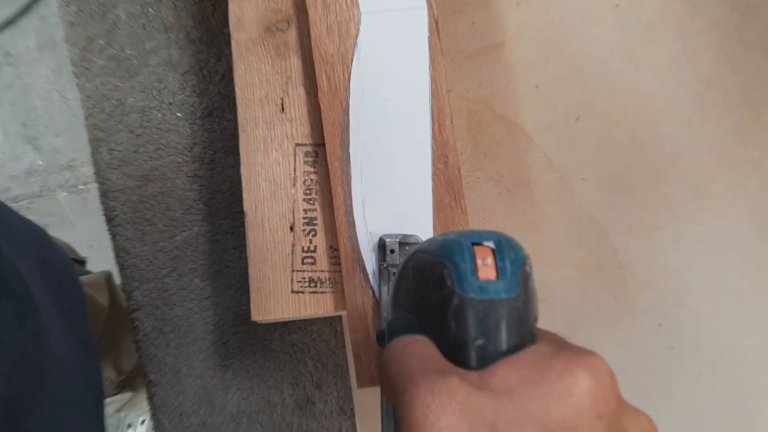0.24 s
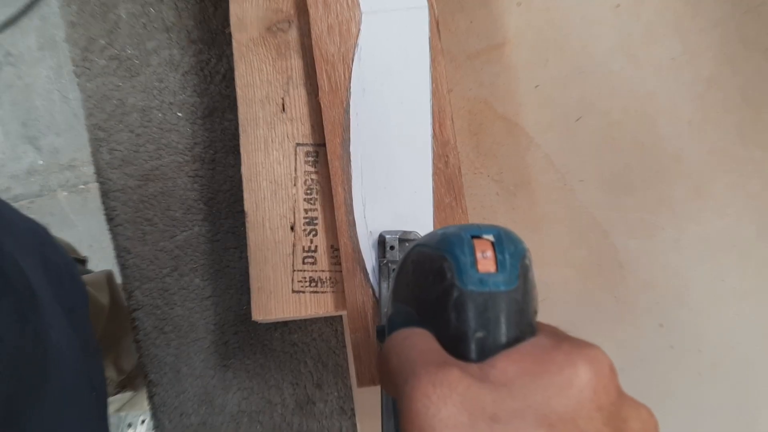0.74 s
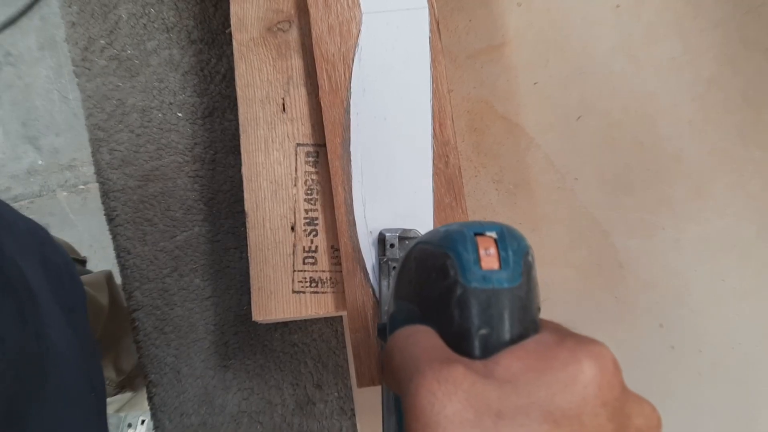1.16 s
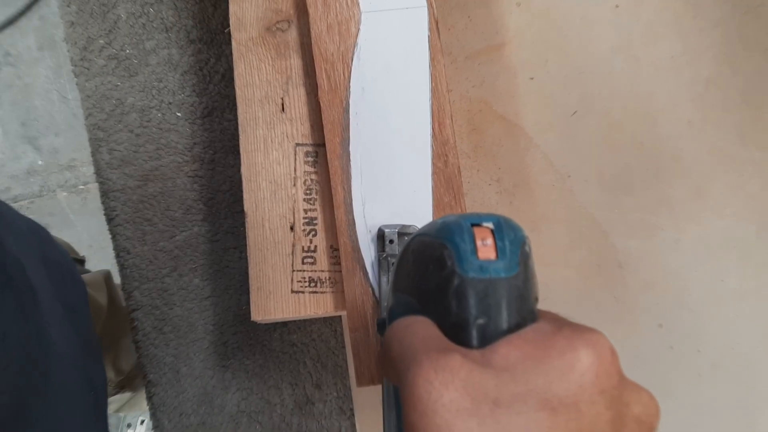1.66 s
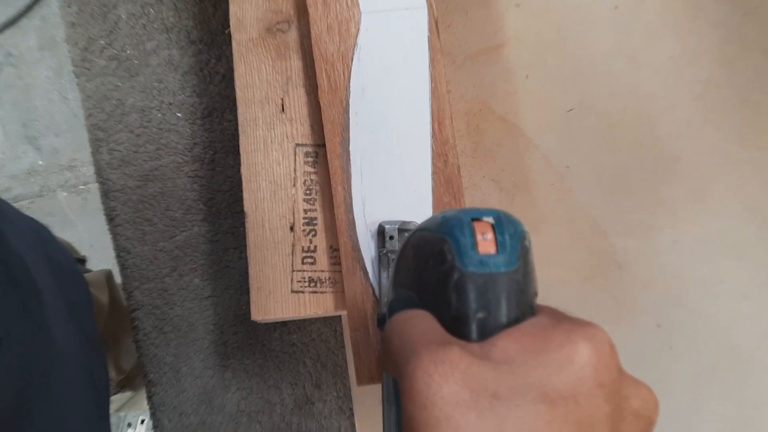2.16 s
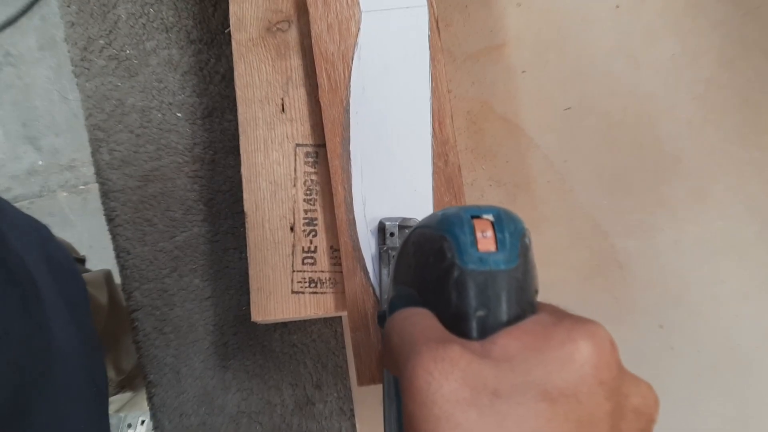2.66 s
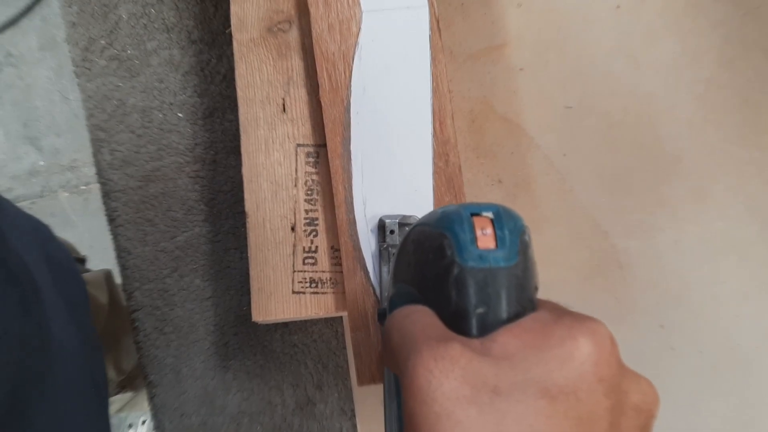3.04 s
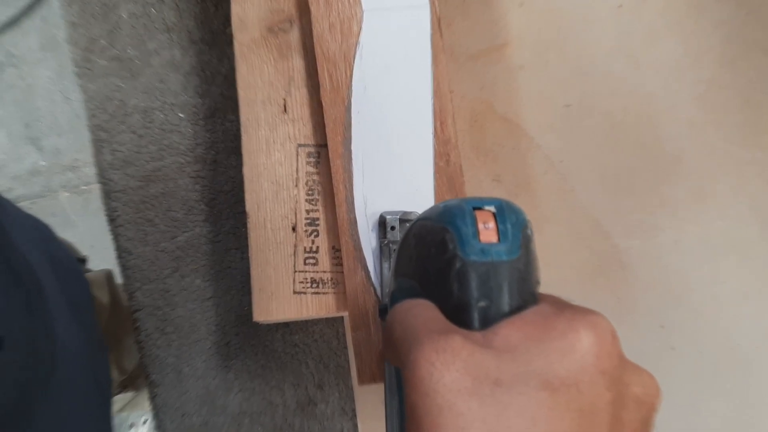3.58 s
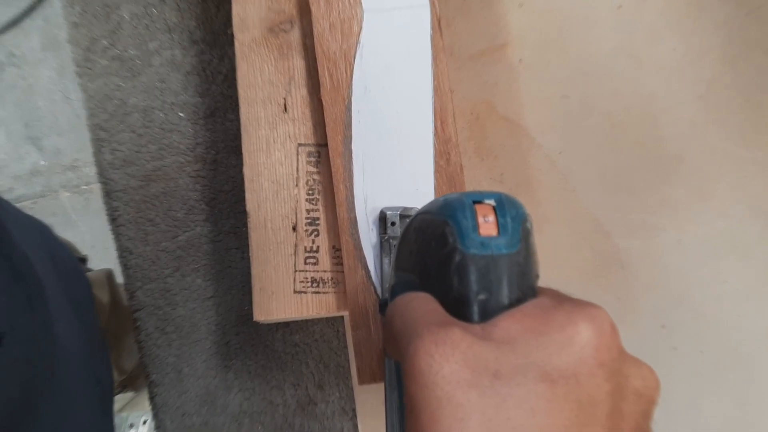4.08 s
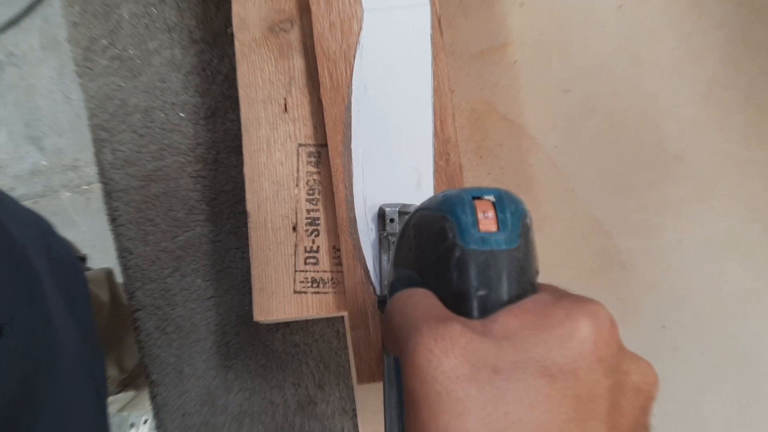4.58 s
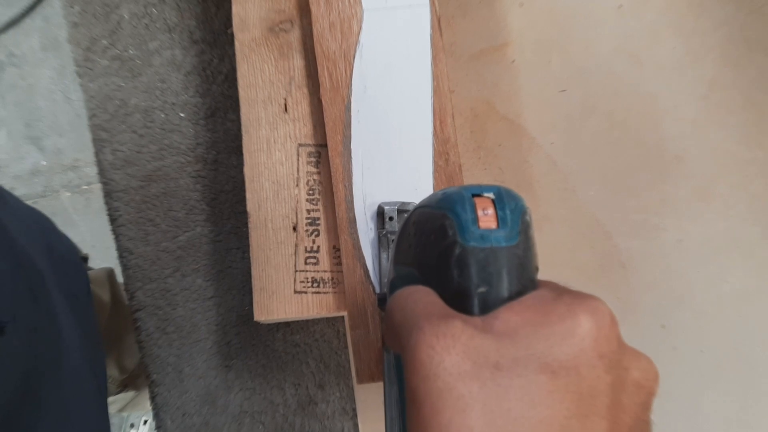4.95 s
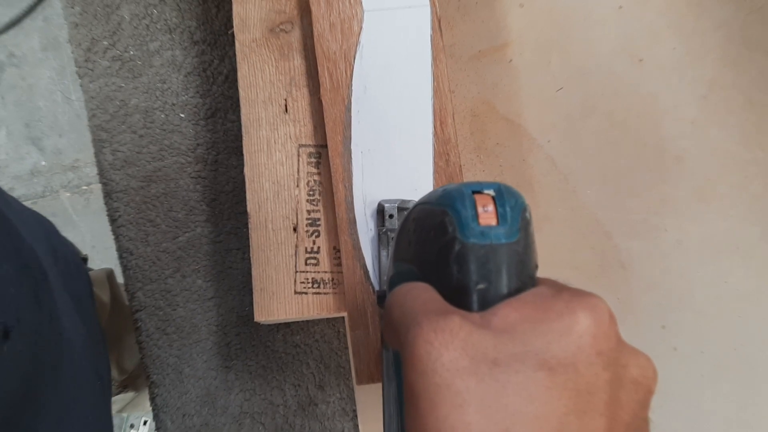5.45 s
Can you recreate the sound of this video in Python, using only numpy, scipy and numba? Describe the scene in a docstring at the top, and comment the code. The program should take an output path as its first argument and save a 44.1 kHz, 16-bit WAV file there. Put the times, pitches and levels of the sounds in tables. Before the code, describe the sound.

A jigsaw cuts along a curve in a wooden board, heard close and dry in stereo. At 0 s a low motor drone and fan are briefly exposed, then within about 0.2 s the blade takes hold and the cut swells to a loud, dense buzz. About 44 strokes a second fuse into a rough rattle: woody ringing around 1 to 3 kHz, piercing metallic chatter and squeaks around 4 to 5 kHz, and airy sawdust hiss above. Gear hum and a faint whine lie beneath. Sharp small cracks come near 0.6, 1.1, 1.5 and 1.9 s, with slight fluttering hops. The motor sags a little from 2 to 4.3 s, and the rasp eases after 3 s. From 3.8 to 5 s catches and lurches crowd together, making it jerkier. From 4.9 s the blade chafes brighter as speed recovers; cutting continues to the end, about 5.7 s.

```python
"""An electric jigsaw cuts along a curve in a board, heard from just above the tool.
About 44 times a second the teeth rasp up through the wood: noise bursts and a repeating rattle ring
resonant modes of board and blade, with short notes, sawdust hiss, squeaks, chafing and sharp catches.
The plunger knocks at both ends of its travel as a bending tone plus ringing noise. Below it the gears hum
and whine as sines locked to the strokes, and the motor fan rushes as coloured noise."""
import sys
import numpy as np
from scipy import signal
from scipy.fft import rfft, irfft, next_fast_len
from scipy.io import wavfile
from numba import njit

SR = 44100
rng = np.random.default_rng(int(sys.argv[2]) if len(sys.argv) > 2 else 0)


def wav_out(sig):
    """Save sig, one row per channel (or a flat mono array), as 16-bit PCM at SR to the path in sys.argv[1]."""
    wavfile.write(sys.argv[1], SR, np.round(np.clip(np.atleast_2d(sig).T, -1, 1) * 32767).astype(np.int16))


N = 251811
TIME = np.arange(N) / SR
OPPOSED = np.array([[1], [-1]])   # left and right with opposite signs


def from_db(db):
    """Decibels to amplitude ratio."""
    return 10 ** (np.asarray(db) / 20)


def rms_one(x):
    """Scale to an rms of 1 over all channels."""
    return x / np.sqrt(np.mean(x ** 2) + 1e-20)


def in_time(rows):
    """Each column of a breakpoint curve at every sample."""
    s, *columns = np.transpose(rows)
    return [np.interp(TIME, s, column) for column in columns]


def through_cut(levels):
    """Values given at even steps from the start to the end, at every sample."""
    return np.interp(TIME, np.linspace(0, TIME[-1], len(levels)), levels)


def wavering(clock, size):
    """A random course of straight lines, with a new value every `size` units of the clock."""
    return np.interp(clock / size, np.arange(400), rng.standard_normal(400))


def held(start_s, length_s, rise_db_per_s, fall_db_per_s):
    """Attack, hold at 0 dB, release; in dB."""
    before_s = np.maximum(start_s - TIME, 0)
    after_s = np.maximum(TIME - start_s - length_s, 0)
    return -rise_db_per_s * before_s - fall_db_per_s * after_s


def around(phase, at, lead):
    """Stroke number and strokes since the place `at`, counted from `lead` strokes before it."""
    stroke, within = np.divmod(phase - at + 1 + lead, 1)
    return stroke.astype(int), within - lead


def burst(phase, at, rise, fall, uneven_db):
    """One swell a stroke, each of its own strength; at, rise and fall are in strokes."""
    stroke, since = around(phase, at, lead=1 / 4)
    strength = from_db(uneven_db * rng.standard_normal(400))
    return strength[stroke] * np.exp(np.minimum(since / rise, -since / fall))


def stereo_noise(side_db):
    """White noise with a common and an opposed part."""
    mid, side = rng.standard_normal((2, N))
    return mid + from_db(side_db) * side * OPPOSED


def colour(x, spectrum):
    """Give x a smooth spectrum, drawn on a logarithmic frequency axis; rms 1."""
    hz, db = np.transpose(spectrum)
    size = next_fast_len(N + 4096)
    bins_hz = np.maximum(np.arange(size // 2 + 1) * SR / size, 1)
    gain = from_db(np.interp(np.log(bins_hz), np.log(hz), db))
    return rms_one(irfft(rfft(x, size) * gain, size)[..., :N])


@njit
def glide_filter(x, angle, r):
    """Two-pole resonator of pole radius r whose angle may move from sample to sample."""
    y = np.zeros(len(x))
    for i in range(2, len(x)):
        drive = (1 - r * r) / 2 * (x[i] - x[i - 2])
        y[i] = drive + 2 * r * np.cos(angle[i]) * y[i - 1] - r * r * y[i - 2]
    return y


def resonance(x, hz, width_hz):
    """A resonance of gain 1 on each channel; its centre may move."""
    angle = 2 * np.pi * hz / SR * np.ones(N)
    radius = np.exp(-np.pi * width_hz / SR)
    return np.array([glide_filter(channel, angle, radius) for channel in x])


MODE_WAVER, MODE_WAVER_DB = 0.0094, 1.5   # resonances waver in pitch (share) and strength


def ring(force, modes):
    """A body whose modes shift in pitch and strength through the cut, and waver; rms 1."""
    out = 0
    for first_hz, last_hz, width_hz, *level_db in modes:
        gain = from_db(through_cut(level_db) + MODE_WAVER_DB * wavering(TIME, size=1 / 25))
        hz = through_cut([first_hz, last_hz]) * (1 + MODE_WAVER * wavering(TIME, size=1 / 25))
        out = out + gain * resonance(force, hz, width_hz)
    return rms_one(signal.sosfilt(signal.butter(2, 900, "high", fs=SR, output="sos"), out))


def dull(x, hz):
    """Wood and plastic radiate little above their last modes: a low-pass at hz."""
    return signal.sosfilt(signal.butter(4, hz, fs=SR, output="sos"), x)


# hum of the drive; the armature turns 17 times in 3 strokes: [f/stroke rate, level/dB before the shake level]
HUM_PARTIALS = [(2, -33), (3, -21), (4, -15), (14 / 3, -17), (5, -7.5), (16 / 3, -12), (17 / 3, -8),
                (6, -1.3), (7, -11.5), (8, -14.5), (10, -9)]
# casing modes: [f at start/Hz, f at end/Hz, width/Hz, relative level/dB at start, halfway, end]
CASING_RESONANCES = [(2250, 2150, 760, -22, -8, -11), (3590, 3900, 22, -17, 5, -3),
                     (6515, 6520, 53, -4, -7.5, -12)]
# tint of the fan rush: [f/Hz, relative level/dB]
FAN_SPECTRUM = [(20, -47), (60, -43), (95, -21), (180, -24), (240, -19), (340, -20), (520, -14.5),
                (680, -9), (920, -8.5), (1200, 0.5), (2500, 3.5), (5000, -1.5), (6000, -25), (16000, -52)]


def motor(phase, shake_db, drone_db):
    """Wavering gear hum and a low drone, the steady ring of the casing and the rush of the fan."""
    turn = phase - .38   # the partials line up once in three strokes, apart from their wander
    hum = 0
    for order, db in HUM_PARTIALS:
        gain = from_db(db + 2 * wavering(phase, size=5))
        hum = hum + gain * np.cos(2 * np.pi * order * turn + .5 * wavering(phase, size=4))
    drone = np.sin(2 * np.pi * 2 * phase) + .5 * np.sin(2 * np.pi * 3 * phase)
    casing = from_db(-33) * ring(stereo_noise(side_db=-3), CASING_RESONANCES)
    fan = from_db(-26.5) * colour(stereo_noise(side_db=-3.5), FAN_SPECTRUM)
    onset = from_db(np.interp(TIME, [0, .15], [-9, 0]))
    return from_db(shake_db) * hum + from_db(drone_db) * drone + onset * (fan + casing)


WHINE_DB, WHINE_DB_PER_RATE = -60, 2   # rms at mean speed; dB per extra stroke per second
WHINE_ORDER = 12   # cycles per stroke


def whine(phase, speed):
    """One gear mesh sings louder when the load comes off the motor."""
    freer = speed - speed.mean()
    db = WHINE_DB + WHINE_DB_PER_RATE * freer + 1.4 * wavering(phase, size=9)
    tone = np.cos(2 * np.pi * WHINE_ORDER * phase + .8 * wavering(phase, size=3))
    return np.sqrt(2) * from_db(db) * tone


# pitch bend of the housing's main mode, before it widens: [place/strokes, f/Hz]
HOUSING_BEND = [(-.14, 4290), (0, 4400), (.1, 4430), (.22, 4340), (.44, 4500), (.56, 4580), (.68, 4630),
                (.76, 4340)]
# housing rattle: [f/Hz, width/Hz, relative level/dB]
HOUSING_RESONANCES = [(2180, 100, 6), (3350, 110, -1), (4290, 120, 10.5), (4680, 95, 8), (6080, 160, 1),
                      (6440, 69, 2.5)]
# the bend widens about this pitch as the cut goes on (share per s)
TONE_CENTRE_HZ, TONE_SPREAD_PER_S = 4480, .2


def plunger(phase, knock_db):
    """At each reversal the plunger rocks the housing sideways, so the ears get opposite signs."""
    top = burst(phase, at=-.025, rise=.06, fall=.06, uneven_db=.7)
    bottom = burst(phase, at=.48, rise=.025, fall=.1, uneven_db=1.5)
    # the bearing takes up each blow softly, which rounds its peak
    swell = .05 + np.tanh(2 * top) + .52 * np.tanh(1.7 * bottom)
    # the main mode is a short tone whose phase wanders and whose pitch bends with the stroke
    wander = np.cumsum(rng.standard_normal(N)) * .045
    bend_hz = np.interp(phase, *np.transpose(HOUSING_BEND), period=1) - TONE_CENTRE_HZ
    tone_hz = TONE_CENTRE_HZ + bend_hz * (1 + TONE_SPREAD_PER_S * TIME)
    tone = swell * np.sin(2 * np.pi * np.cumsum(tone_hz) / SR + wander)
    knock = rms_one(resonance([tone], 4420, 1000))
    chatter = swell * stereo_noise(side_db=-20)
    rattle = rms_one(sum(from_db(db) * resonance(chatter, hz, width_hz)
                         for hz, width_hz, db in HOUSING_RESONANCES))
    rocking = dull(knock + from_db(-6) * rattle, 7200)
    # the left ear gets slightly more
    return from_db(knock_db - 4.0) * rocking * OPPOSED * from_db(1.24 * OPPOSED)


def teeth(phase, size=1024):
    """The same row of teeth meets the wood on every stroke: a repeating rattle, even in spectrum."""
    place = np.arange(size) / size
    since = (place + 1 / 4) % 1 - 1 / 4
    swell = .17 + np.exp(np.minimum(since / .06, -since / .16))
    rattle = rng.standard_normal(size)
    # shape the rattle in time, then level its spectrum; twice, more gently the second time
    for share in (1, .5):
        rattle = irfft(np.exp(1j * np.angle(rfft(rattle * swell ** share))))
    return rms_one(np.interp(phase % 1, place, rattle))


# board: [f at start/Hz, f at end/Hz, width/Hz, place/strokes, relative level/dB at five even steps]
BOARD_RESONANCES = [(1065, 1132, 80, .3, -12, -6, -6, -4.5, -7),
                    (1295, 1350, 100, .28, 3.5, -1, -5, -2, 2.5),
                    (1750, 1560, 100, .12, 2.5, 5, 5.5, 1.5, 0), (2070, 1945, 100, .01, 3, 5, 5, 8, 8),
                    (2340, 2290, 140, .1, -2.5, 3, 0, -1, 7), (2665, 2600, 90, .13, 6.5, 6, 7, 4, 2),
                    (3090, 2950, 100, -.1, -.5, -1.5, 1, 1.5, 3.5)]
# tint of the direct scrape: [f/Hz, relative level/dB]
RASP_SPECTRUM = [(100, -47), (400, -41), (650, -74), (900, 13.5), (1200, 4.5), (2200, -30), (3300, -58),
                 (4200, 18.5), (5200, 21), (5900, 16.5), (8000, 15), (16000, -17)]
CATCH_BOARD_DB = -1.5   # how strongly a catch drives the board


def rasp(phase, rasp_db, caught):
    """Teeth graze the wood, bite and tear it on the way up, and rub it on the way down."""
    graze = burst(phase, at=-.1, rise=.06, fall=.08, uneven_db=1.0)
    pull = burst(phase, at=.025, rise=.04, fall=.13, uneven_db=.5)
    drag = burst(phase, at=.18, rise=.04, fall=.05, uneven_db=1.0)
    back = burst(phase, at=.56, rise=.12, fall=.08, uneven_db=1.2)
    swell = .1 + .28 * graze + np.tanh(1.4 * pull) + .25 * drag + .3 * back
    tearing = rms_one(swell * stereo_noise(side_db=-9))
    force = from_db(rasp_db) * (.72 * tearing + 1.02 * teeth(phase))
    force = force + from_db(CATCH_BOARD_DB) * caught * stereo_noise(side_db=-6)
    modes = [(first_hz, last_hz, width_hz, *level_db)
             for first_hz, last_hz, width_hz, _, *level_db in BOARD_RESONANCES]
    ringing = from_db(-7.5) * ring(force, modes)
    scrape = from_db(-13.0) * colour(force, RASP_SPECTRUM)
    return dull(force.std() * (ringing + scrape), 6500)


NOTE_DB, NOTE_RISE, NOTE_FALL = -2.2, .13, .17   # level against the rasp; rise and fall in strokes
NOTE_UNEVEN_DB, NOTE_SCATTER = 1.5, .95   # change from pull to pull, in level and in phase (radians)


def board_notes(phase, speed, rasp_db):
    """Each stroke rings every mode of the board as one short note, each at its own place."""
    out = 0
    for first_hz, last_hz, width_hz, at, *level_db in BOARD_RESONANCES:
        stroke, since = around(phase, at, lead=1 / 2)
        strength, scatter = rng.standard_normal((2, 400))[:, stroke]
        swell = np.exp(-(since / np.where(since < 0, NOTE_RISE, NOTE_FALL)) ** 2)
        gain = np.sqrt(width_hz) * from_db(through_cut(level_db) + NOTE_UNEVEN_DB * strength)
        cycles = through_cut([first_hz, last_hz]) * since / speed + at
        out = out + gain * swell * np.sin(2 * np.pi * cycles + NOTE_SCATTER * scatter)
    return from_db(rasp_db + NOTE_DB) * rms_one(out)


# tint of the sawdust spray: [f/Hz, relative level/dB]
CHIPS_SPECTRUM = [(1000, -34), (4000, 9), (5800, -6), (6500, 3), (7200, -3.5), (8500, -4), (10000, -6.5),
                  (13000, -7.5), (16000, -16.5)]


def chips(phase, hiss_db, caught):
    """Sawdust sprays all the time, most on the upstroke and when a tooth catches."""
    up = burst(phase, at=.005, rise=.05, fall=.14, uneven_db=1.6)
    down = burst(phase, at=.46, rise=.06, fall=.15, uneven_db=1.6)
    spray = (0.7 + up + 0.52 * down) * stereo_noise(side_db=1.0)
    spray = spray + 1.1 * caught * stereo_noise(side_db=-3)
    return from_db(hiss_db + 7.0) * colour(spray, CHIPS_SPECTRUM)


# blade in its guide, its lowest mode taking over as the curve tightens:
# [f at start/Hz, f at end/Hz, width/Hz, relative level/dB at five even steps]
BLADE_RESONANCES = [(3750, 3810, 70, 0, 2, 4, 8, 13), (4030, 4015, 85, 3, 5, 6, 5, 0),
                    (4430, 4400, 200, 4, 1, -3, -4, -1), (4680, 4900, 250, -5, -4, -7, -6, 0)]
CATCH_BLADE_DB = -9.5   # how strongly a catch drives the blade


def blade(phase, rasp_db, caught):
    """The blade slides in its guide, hardest near each reversal; teeth rattle it, a catch plucks it."""
    top = burst(phase, at=.07, rise=.09, fall=.09, uneven_db=1.2)
    bottom = burst(phase, at=.47, rise=.1, fall=.14, uneven_db=1.2)
    # the rasp level is taken out here because it multiplies the result
    pluck = from_db(CATCH_BLADE_DB - rasp_db) * caught
    sliding = (.2 + top + .6 * bottom + pluck) * stereo_noise(side_db=-6)
    force = sliding + .5 * teeth(phase)
    return from_db(rasp_db - 2.0) * dull(ring(force, BLADE_RESONANCES), 7400)


# squeaks of the blade:
# [place/strokes, half length/strokes, f/Hz, glide/Hz, level/dB at five even steps before the press level]
BLADE_SQUEAKS = [(-.05, .09, 4100, -30, -20, -21, -22.5, -20.5, -24),
                 (.11, .08, 4540, 90, -20.5, -22, -29, -38, -29),
                 (.13, .07, 5130, -120, -33, -25, -27.5, -31, -22),
                 (.56, .075, 4740, 160, -23.5, -20.5, -25, -32, -19)]
# change from stroke to stroke in level and pitch; jitter in strokes
SQUEAK_UNEVEN_DB, SQUEAK_SPREAD_HZ, SQUEAK_JITTER = 1.3, 60, .005
SQUEAK_ROUGH = 0.0393   # wander of the phase, radians per sample


def squeaks(phase, press_db):
    """The blade squeaks at the same places of every stroke, each squeak gliding up or down."""
    out = 0
    for at, length, hz, glide_hz, *level_db in BLADE_SQUEAKS:
        jittered = phase + SQUEAK_JITTER * wavering(phase, size=1)
        stroke, since = around(jittered, at, lead=1 / 2)
        strength, detune = rng.standard_normal((2, 400))[:, stroke]
        pitch_hz = hz + glide_hz * np.tanh(since / length / 2) + SQUEAK_SPREAD_HZ * detune
        wander = np.cumsum(rng.standard_normal(N)) * SQUEAK_ROUGH
        gain = from_db(through_cut(level_db) + press_db + SQUEAK_UNEVEN_DB * strength)
        swell = gain * np.exp(-(since / length) ** 2)
        out = out + swell * np.sin(2 * np.pi * np.cumsum(pitch_hz) / SR + wander)
    return out


# spells in which the saw hops once in three strokes: [t/s, length/s, landing place/strokes, depth/dB]
HOP_SPELLS = [(.75, .67, .4, 1), (1.55, .85, 1.35, 1.3), (2.45, .9, 2.3, 1.5), (3.5, 1.05, .45, 1.8),
              (4.6, .4, 2.6, 1.4), (5.3, .25, 2.5, .9)]
# single lurches, pressing down or lifting: [t/s, level change/dB]
SINGLE_LURCHES = [(.065, 4), (.109, -1), (.381, -5), (.901, 2.2), (1.105, 3.3), (1.309, 2.8), (1.355, 1),
                  (1.423, -6), (3.483, -2), (3.529, -3), (3.621, 0.5), (3.759, 2), (3.989, 3), (4.035, -1),
                  (4.311, -3.5), (4.357, -1), (4.426, 0), (4.494, -2.5), (4.517, 3.5), (4.54, -3),
                  (4.701, 0), (4.815, -5), (4.883, -1), (4.952, -1), (4.974, 3), (5.156, 2.5), (5.179, -7),
                  (5.427, -5), (5.517, 1)]
HOP_FADE_DB_PER_S = 300   # fades the depth of the hops in and out
LURCH_S = .0095   # half length of a lurch


def bounce(phase):
    """The saw hops on the board with every third stroke, and now and then lurches; in dB."""
    hops = 0
    for s, length_s, at, db in HOP_SPELLS:
        depth_db = db * from_db(held(s, length_s, HOP_FADE_DB_PER_S, HOP_FADE_DB_PER_S))
        hops = hops + depth_db * np.cos(2 * np.pi * (phase - at) / 3)
    return hops + sum(db * np.exp(-((TIME - s) / LURCH_S) ** 2) for s, db in SINGLE_LURCHES)


# the teeth catch hard: [t/s, level/dB before the crack and tear offsets]
TOOTH_CATCHES = [(0.6296, -11), (1.0826, -10), (1.4677, -12.5), (1.9003, -11.5), (3.7566, -9),
                 (4.0558, -11.5), (4.4006, -10), (4.5144, -9), (4.652, -9.5), (4.7899, -9.5), (4.8585, -10),
                 (4.9263, -9), (5.3362, -10.5)]
CRACK_DB, CRACK_DELAY_S, CRACK_S = 5, 0.0017, 0.00022   # the snap: offset, time to peak, rise and fall
TEAR_DB, TEAR_S = -10, 0.0035   # the tear: offset, fall time


def catches():
    """Fibres snap with a short crack when a tooth catches, and the tear runs on for a moment."""
    swell = np.zeros(N)
    for s, db in TOOTH_CATCHES:
        near = np.abs(TIME - s) < 10 * TEAR_S
        since = TIME[near] - s - CRACK_DELAY_S
        for part_db, fall_s in ((CRACK_DB, CRACK_S), (TEAR_DB, TEAR_S)):
            swell[near] += from_db(db + part_db) * np.exp(np.minimum(since / CRACK_S, -since / fall_s))
    return swell


# the blade chafes against the side of the kerf: [t/s, length/s, level/dB]
KERF_CHAFES = [(1.9, .5, -37), (4.873, .85, -30)]
# with no fall, each chafe stays on whatever its length
CHAFE_RISE_DB_PER_S, CHAFE_FALL_DB_PER_S = 90, 0


def chafe(phase):
    """The flank of the blade rings high just after the start of each pull."""
    chafe_db = np.max([db + held(s, length_s, CHAFE_RISE_DB_PER_S, CHAFE_FALL_DB_PER_S)
                       for s, length_s, db in KERF_CHAFES], axis=0)
    swell = .18 + burst(phase, at=.04, rise=.07, fall=.08, uneven_db=1.5)
    rubbing = swell * stereo_noise(side_db=-9)
    return from_db(chafe_db) * rms_one(resonance(resonance(rubbing, 5080, 800), 5160, 430))


# motor speed, sagging under load: [t/s, rate/strokes per s]
STROKE_RATE = [(0.0, 44.19), (1.45, 44.13), (2.15, 43.67), (3.1, 43.49), (4.3, 43.49), (5.0, 43.92),
               (5.71, 44.76)]
# how hard the saw is fed into the wood: [t/s, rasp level/dB before bite and grip]
FEED_LEVEL = [(0, -24.5), (1.1, -27), (2.15, -24.5), (3.35, -28), (3.8, -27), (5.1, -26.5), (5.71, -27)]
# play of the plunger: [t/s, knock level/dB before bite, grip and trim]
KNOCK_LEVEL = [(0, -15), (1.2, -15), (3.0, -13.5), (4.3, -15), (5.1, -18.5), (5.71, -16)]
# how hard the tool shakes: [t/s, hum level/dB added to each partial]
SHAKE_LEVEL = [(0, -52), (2.6, -49), (3.9, -51.5), (4.7, -54), (5.71, -55)]
# where in the stroke the teeth bite, earlier as the curve tightens: [t/s, place/strokes]
BITE_PLACE = [(0, .015), (2.8, .01), (4.2, -.015), (5.71, -.02)]
FIRST_PHASE = .179   # strokes
# the blade takes hold: what it drives starts this far down and closes in with this time constant
BITE_DB, BITE_S = 17, 0.073
# the grain resists unevenly; shares of grip and bounce felt by the plunger and the sawdust
GRIP_DB, GRIP_KNOCK_SHARE, GRIP_HISS_SHARE = 0.82, 0.6, 0.72
CHIPS_DB, CHIPS_FOLLOW = -31.5, 0.76   # hiss at mean feed, before trim; share of the feed's swing
RETURN_AT, RETURN_DB = .47, -9   # the return stroke rings the board softly, this many strokes later
# a low drone holds briefly and dies as the blade takes hold
DRONE_DB, DRONE_HOLD_S, DRONE_FALL_DB_PER_S = -42.5, 0.037, 280


def scene():
    """Motor speed times every layer; the feed sets how loudly the wood is cut."""
    speed, = in_time(STROKE_RATE)
    phase = FIRST_PHASE + np.cumsum(speed) / SR   # in strokes
    feed_db, = in_time(FEED_LEVEL)
    knock_db, = in_time(KNOCK_LEVEL)
    shake_db, = in_time(SHAKE_LEVEL)
    bite_place, = in_time(BITE_PLACE)
    bite_db = -BITE_DB * np.exp(-TIME / BITE_S)
    grip_db = GRIP_DB * wavering(phase, size=2) + bounce(phase)
    rasp_db = feed_db + bite_db + grip_db
    feed_swing_db = feed_db - feed_db.mean()
    hiss_db = CHIPS_DB + CHIPS_FOLLOW * feed_swing_db + bite_db + GRIP_HISS_SHARE * grip_db
    knock_db = knock_db + bite_db + GRIP_KNOCK_SHARE * grip_db
    drone_db = DRONE_DB + held(0, DRONE_HOLD_S, 0, DRONE_FALL_DB_PER_S)
    caught = catches()

    bite_phase = phase - bite_place
    notes = board_notes(bite_phase, speed, rasp_db)
    notes = notes + board_notes(bite_phase - RETURN_AT, speed, rasp_db + RETURN_DB)
    wood = rasp(bite_phase, rasp_db, caught) + notes + chips(phase, hiss_db, caught)
    steel = blade(phase, rasp_db, caught) + chafe(phase) + squeaks(phase, bite_db + grip_db)
    left, right = wood + steel
    cut = np.array([left, np.roll(right, 1)])  # the cut reaches the right one sample later

    drive = motor(phase, shake_db, drone_db) + whine(phase, speed)
    tool = drive * from_db(0.91 * OPPOSED) + plunger(phase, knock_db)
    return cut * from_db(0.37 * OPPOSED) + tool


CUTOFF_HZ = 15550


def record(dry):
    """The highest peaks are rounded and the top is cut steeply."""
    rounded = dry / (1 + (dry / .93) ** 8) ** (1 / 8)
    return signal.sosfilt(signal.ellip(12, .2, 90, CUTOFF_HZ, fs=SR, output="sos"), rounded)


dry = scene()
out = record(dry)
wav_out(out)
```